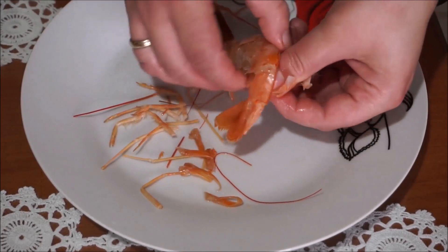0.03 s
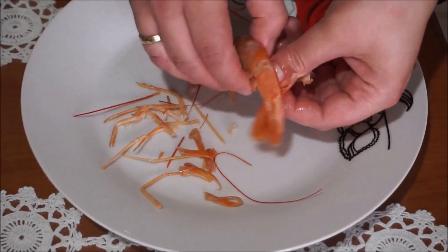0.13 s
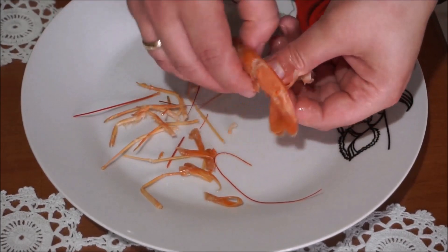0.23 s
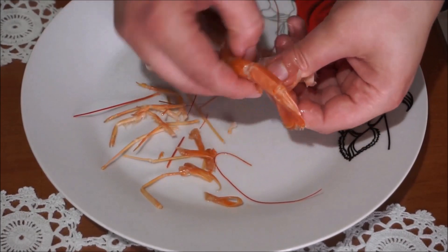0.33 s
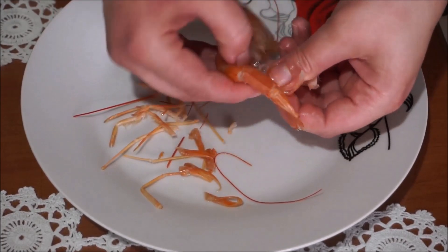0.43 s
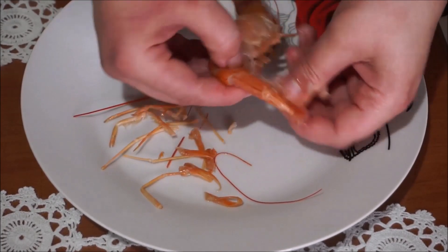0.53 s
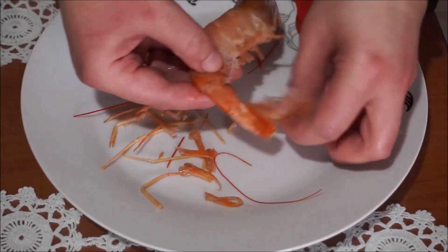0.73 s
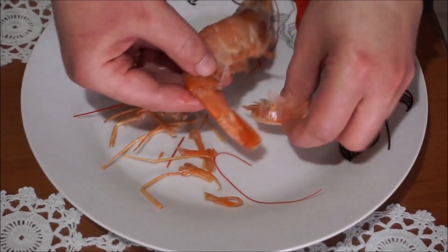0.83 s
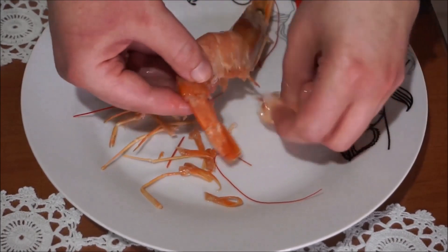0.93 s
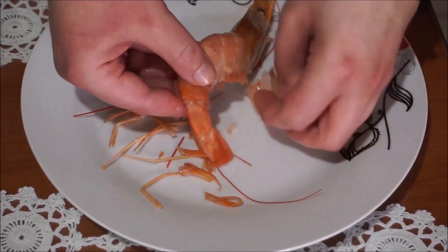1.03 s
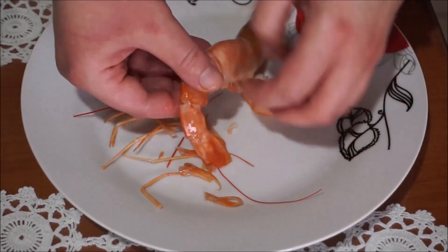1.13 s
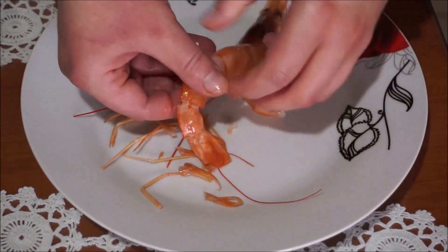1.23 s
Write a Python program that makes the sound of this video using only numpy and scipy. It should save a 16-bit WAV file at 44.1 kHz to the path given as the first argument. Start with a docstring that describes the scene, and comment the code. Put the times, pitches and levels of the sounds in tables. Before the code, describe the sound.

A shrimp shell snaps as fingers peel it: a soft click, a small crack and a loud one, then faint ticks, wet rubbing and two more clicks. It sounds close, in a quiet kitchen with a humming appliance.

```python
"""Peeling a shrimp in a quiet kitchen

Fingers peel a shrimp over a china plate: a soft click, a small and a loud crack of the shell, then
faint ticks, wet rubbing and two more clicks. Each snap is a tiny fracture that rings the shell.
Plate and table throw the snaps straight back and the room rings briefly. Behind it an appliance
hums, with a thin whine, a low rumble and a bed of room noise that slowly grows."""
import sys
import numpy as np
from scipy import signal
from scipy.fft import rfft, irfft
from scipy.io import wavfile
from scipy.ndimage import map_coordinates

SR = 44100
rng = np.random.default_rng(int(sys.argv[2]) if len(sys.argv) > 2 else 0)


def generate_wav(signal):
    """Clip the signal to [-1, 1] and save it as 16-bit WAV at the path in sys.argv[1]."""
    frames = np.transpose(np.atleast_2d(signal))
    scaled = np.clip(frames, -1, 1) * 32767
    pcm = np.round(scaled).astype(np.int16)
    wavfile.write(sys.argv[1], SR, pcm)


N = 57330
T = np.arange(N) / SR
FFT_SIZE = 2 ** 17
HZ = np.fft.rfftfreq(FFT_SIZE, 1 / SR)
TOP_HZ = 15800
SIDES = np.array([[.5], [-.5]])  # splits a phase lead between left and right


def amp(db):
    """Decibels to gain."""
    return 10 ** (np.asarray(db) / 20)


def unit(x):
    """Scale to rms 1."""
    return x / np.sqrt(np.mean(x ** 2) + 1e-20)


def along(points, hz=HZ):
    """Join (freq_hz, value) points on a log frequency axis."""
    freqs, values = np.transpose(points)
    return np.interp(np.log(hz + 1), np.log(freqs + 1), values)


def curve(points):
    """An envelope through (time_s, value) points."""
    return np.interp(T, *np.transpose(points))


def swells(rows):
    """An envelope of bell-shaped swells, from rows of peak_s, half_length_s, level_db."""
    return sum(amp(db) * np.exp(-.5 * ((T - s) / half) ** 2) for s, half, db in rows)


def wobble(rate):
    """A smooth random drift, rate knots a second."""
    return map_coordinates(rng.standard_normal(64), [T * rate], mode="wrap")


def fade(t, t60):
    """A decay of 60 dB in t60 seconds."""
    return np.exp(-np.log(1000) * t / t60)


def filtered(x, response):
    """Pass x through a frequency response."""
    return irfft(rfft(x, FFT_SIZE) * response, FFT_SIZE)[..., :N]


def causal(db):
    """The minimum-phase response with these gains."""
    cepstrum = irfft(np.log(amp(db)))
    cepstrum[..., 1:FFT_SIZE // 2] *= 2
    cepstrum[..., FFT_SIZE // 2 + 1:] = 0
    return np.exp(rfft(cepstrum))


def resonance(hz, width):
    """The response of one damped mode."""
    return 1j * HZ * width / (hz * hz - HZ ** 2 + 1j * HZ * width)


def delay(s):
    """A delay as a frequency response."""
    return np.exp(-2j * np.pi * HZ * s)


def room_tone(base_db=-52.5):
    """A slowly growing bed of noise, narrower in the bass and wide in the treble."""
    # colour of the bed: freq_hz, gain_db
    spectrum = [(20, -13), (60, -21.5), (150, -3.5), (250, -3.5), (330, 5), (460, 3), (600, -1),
                (750, -1.5), (980, -10.5), (1300, -3), (2000, -10.5), (2650, -3), (3300, -15), (5000, -15),
                (10000, -17.5), (15500, -22.5)]
    # likeness of left and right: freq_hz, correlation
    likeness = [(30, 0.47), (90, 0.29), (180, 0.6), (350, 0.22), (700, 0.071), (1400, 0.15), (3000, 0.1),
                (12000, 0.1)]
    # slow rise: time_s, gain_db
    rise = [(0, -2), (.2, -1.5), (.45, 0.5), (.58, 1.5), (.72, 2.5), (.95, 1.5), (1.1, 3.5), (1.3, 4)]
    width = np.arccos(along(likeness)) / 2
    mid_side = np.array([np.cos(width), np.sin(width)])
    mid, side = filtered(rng.standard_normal((2, FFT_SIZE)), amp(along(spectrum)) * mid_side)
    return amp(base_db + curve(rise)) * unit(np.array([mid + side, mid - side]))


def rumble():
    """A low mono rumble drops away at the start and grows back toward the end."""
    # envelope: time_s, level_db
    level = [(0, -64.5), (.15, -85), (.5, -82), (.8, -77), (.93, -61.5), (1.12, -68.5), (1.25, -62)]
    # bass-heavy colour: freq_hz, gain_db
    spectrum = [(15, -1), (50, -2), (75, 5.5), (105, 10.5), (170, -21), (400, -45), (1500, -80)]
    return amp(curve(level)) * unit(filtered(rng.standard_normal(FFT_SIZE), amp(along(spectrum))))


def whine(pitch_hz=1190, left_lead_rad=0.51):
    """A thin, faint note comes and goes."""
    # its swells: peak_s, half_length_s, level_db
    peaks = [(.44, 0.066, -64.5), (.57, 0.021, -64), (.8, 0.027, -58), (.925, 0.021, -60.5),
             (1.078, 0.0076, -54.5)]
    phase = 2 * np.pi * pitch_hz * T + .5 * wobble(16.2)
    return np.sqrt(2) * swells(peaks) * np.sin(phase + SIDES * left_lead_rad)


def appliance_hum():
    """A motor holds a steady note among weaker, wavering partials."""
    # motor partials: pitch_hz, base_db, waver_db, left_lead_rad
    partials = [(50.7, -76.5, 1.5, 0), (100, -77, 3, 0.94), (394.25, -49.5, -0.24, 0.33),
                (693.6, -71.5, 5.5, 1), (1580, -79.5, 9, 0.94)]
    # level ride of the whole hum: time_s, gain_db
    ride = [(0, -3), (.25, -2.5), (.45, -1.5), (.68, -0.5), (.76, -2.5), (.84, 2.5), (1.02, 1.5),
            (1.09, 0.5), (1.3, 1.5)]
    hum = np.zeros((2, N))
    for hz, db, waver_db, lead in partials:
        phase = 2 * np.pi * (hz * T + rng.random()) + 0.063 * waver_db * wobble(9.1)
        hum += np.sqrt(2) * amp(db + waver_db * wobble(12.4)) * np.sin(phase + SIDES * lead)
    return hum * amp(curve(ride))


def kitchen(x, table_s=.0072, table_db=-17.5, walls_s=0.059, walls_db=-7.5, tail_db=-2.5):
    """The direct sound, a slap off the table, early wall reflections and a short diffuse tail."""
    # decay of the tail: freq_hz, t60_s
    decay = [(300, 0.54), (1000, 0.41), (2600, 0.47), (7000, 0.38), (15000, 0.3)]
    # colour of the reverb: freq_hz, gain_db
    colour = [(300, 4.5), (1100, 5), (1900, -4), (2700, 3.5), (3400, -3), (4500, 6), (6200, 2), (8500, -4),
              (11000, -5.5), (13300, -4.5), (15000, 8)]
    near = filtered(x, 1 + amp(table_db) * delay(table_s))
    hz, t, noise = signal.stft(rng.standard_normal((2, N)), SR, nperseg=256)
    tail = signal.istft(noise * fade(t, along(decay, hz)[:, None]), SR, nperseg=256)[1][:, :N]
    walls = rng.standard_normal((2, N)) / (1 + (T / walls_s) ** 10)
    onset = 1 - np.exp(-T / 0.0013)
    reverb = (amp(tail_db) * unit(tail) + amp(walls_db) * unit(walls)) * onset / np.sqrt(N)
    return near + filtered(x.mean(0), rfft(reverb, FFT_SIZE) * causal(along(colour)))


def plate(lag_s, echo_db=-15.5):
    """The response that adds a snap's bounce off the china plate."""
    return 1 + amp(echo_db) * delay(lag_s)


def crackle(spectrum, grains_per_s):
    """Tiny random slips merge into a grainy texture of rms 1."""
    grains = rng.standard_normal(N) * (rng.random(N) < grains_per_s / SR)
    return unit(filtered(grains, amp(along(spectrum))))


def rubbing():
    """Fingertips slide on wet shell with a fine crackle."""
    # finger strokes: time_s, level_db
    strokes = [(0, -97), (.42, -66.5), (.58, -59.5), (.67, -71), (.76, -70), (.805, -60.5), (.86, -63.5),
               (.935, -75), (.985, -57.5), (1.03, -74), (1.3, -87)]
    # bright friction colour: freq_hz, gain_db
    spectrum = [(500, -25), (2000, 12), (5000, -0.5), (9500, 7.5), (16000, -6)]
    return amp(curve(strokes)) * crackle(spectrum, grains_per_s=2000)


def crunching():
    """Pieces of shell pull off the flesh with a soft crunch."""
    # pulls: peak_s, half_length_s, level_db
    pulls = [(.968, 0.015, -58), (1.105, 0.0063, -45), (1.125, 0.011, -56.5), (1.285, 0.041, -57)]
    # dull crunch colour: freq_hz, gain_db
    spectrum = [(700, -26), (1300, -13), (1600, 0), (2000, -6.5), (2550, -2.5), (3600, -11.5), (6000, -23),
                (12000, -44)]
    return swells(pulls) * crackle(spectrum, grains_per_s=2500)


def fracture(start_s, db, response, tear_db=5, tear_t60_s=0.0066, spread=0.35, boost_db=11.5):
    """One sharp break and a few milliseconds of tearing drive the part that rings."""
    noise = rng.standard_normal((3, N))  # centre, left, right
    tear = (np.sqrt(1 - spread) * noise[0] + np.sqrt(spread) * noise[1:]) * fade(T, tear_t60_s)
    force = amp(tear_db) * tear / np.linalg.norm(tear, axis=1, keepdims=True)
    force[:, 0] = 1  # the break itself
    drive = rfft(force, FFT_SIZE)
    drive *= causal(-10 * np.log10(np.abs(drive) ** 2 + .2))  # evens out the spectrum
    return amp(db + boost_db) * irfft(drive * response * delay(start_s), FFT_SIZE)[:, :N]


def ticks(width_hz=2700):
    """Tiny splinters ring only the top of the treble."""
    # splinters: start_s, gain_db, pitch_hz
    splinters = [(0.3467, -20.5, 10000), (0.5598, -29, 12200), (0.568, -35, 10400), (0.583, -36, 9500)]
    return sum(fracture(s, db, resonance(hz, width_hz) ** 2) for s, db, hz in splinters)


def clicks():
    """A joint gives way with one damped note and a little sharp edge."""
    # joints: start_s, gain_db, pitch_hz, width_hz, edge_db, plate_echo_s
    joints = [(0.2055, -8, 1820, 970, -14.5, 0.00107), (1.0973, -11.5, 2610, 510, -24, .0019),
              (1.1221, -25, 3240, 1400, -27, .0019)]
    # colour of the sharp edge: freq_hz, gain_db
    edge_colour = [(1200, -32), (3500, -3.5), (6500, -6.5), (8700, -8), (11200, 1.5), (13000, -23),
                   (15500, -3)]
    edge = causal(along(edge_colour))
    return sum(fracture(s, db, (resonance(hz, width) + amp(edge_db) * edge) * plate(lag))
               for s, db, hz, width, edge_db, lag in joints)


def cracks():
    """Brittle breaks ring all the modes of the shell."""
    # breaks: start_s, gain_db, tilt_db_per_octave, plate_echo_s
    breaks = [(0.2494, -13.5, 0.5, .0009), (0.2603, -0.5, -0.5, 0.000943)]
    # shell modes: pitch_hz, width_hz, gain_db
    modes = [(1980, 424, 0), (3520, 630, 0.5), (5600, 400, -10), (7800, 860, -1.5), (8880, 420, 0),
             (9900, 1550, 0), (12350, 870, -1)]
    power = sum(np.abs(amp(db) * resonance(hz, width)) ** 2 for hz, width, db in modes)
    ring_db = 10 * np.log10(power + 1e-6)
    octaves = np.log2((HZ + 100) / 5000)
    return sum(fracture(s, db, causal(ring_db + tilt * octaves) * plate(lag))
               for s, db, tilt, lag in breaks)


def shell(bass_lag_s=0.000403):
    """Snaps cross the shell as bending waves, lows trailing highs, and radiate into the air."""
    # how the shell gives off sound: freq_hz, gain_db
    radiation = [(300, 4.5), (950, -12), (1600, -1), (3700, 0), (4300, -6.5), (5400, -1), (11000, 0),
                 (11900, -6.5), (12900, -1), (13800, 3), (14600, -4), (15800, -28)]
    bending = np.exp(-1j * np.pi * bass_lag_s * HZ * (2 - HZ / TOP_HZ))
    return filtered(cracks() + clicks() + ticks(), bending * causal(along(radiation)))


def scene():
    """The peeling in the kitchen, over its quiet background."""
    peeling = shell() + rubbing() + crunching()
    return kitchen(peeling) + appliance_hum() + whine() + room_tone() + rumble()


def record(dry):
    """A steep low-pass cuts everything above TOP_HZ."""
    return filtered(dry, 1 / np.sqrt(1 + (HZ / TOP_HZ) ** 200))


dry = scene()
out = record(dry)
generate_wav(out)
```